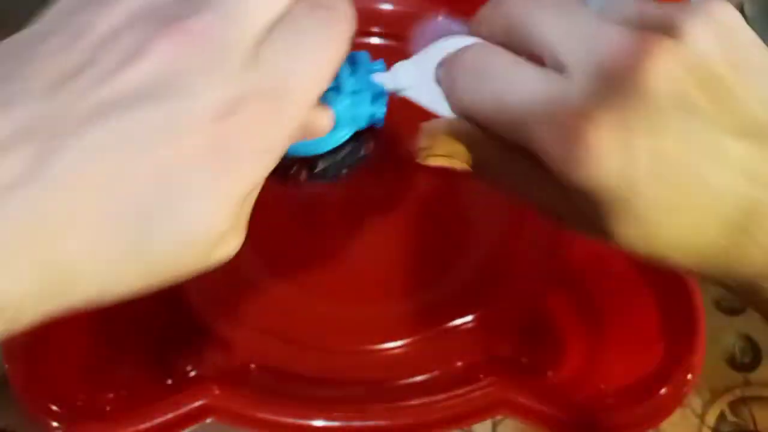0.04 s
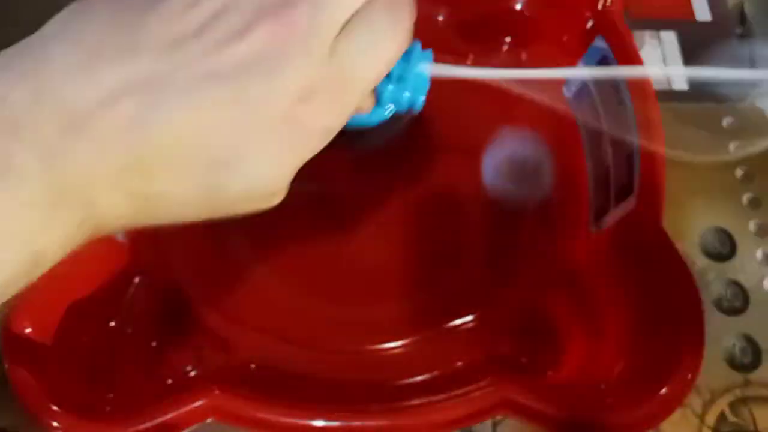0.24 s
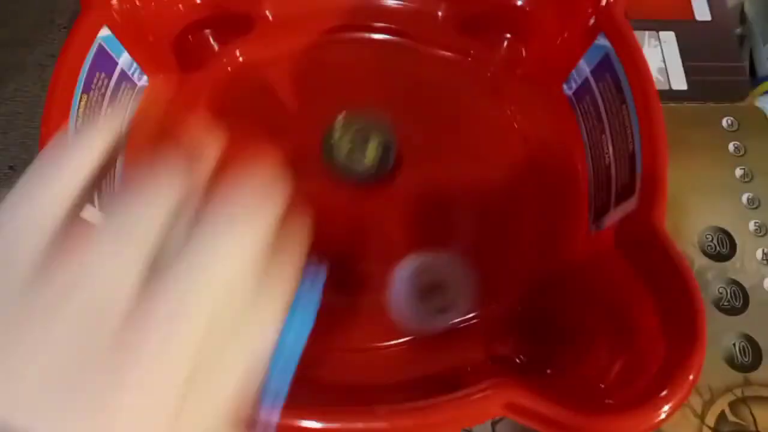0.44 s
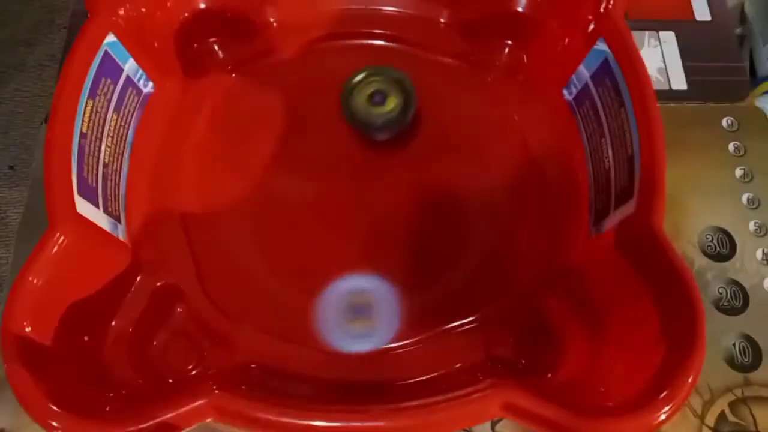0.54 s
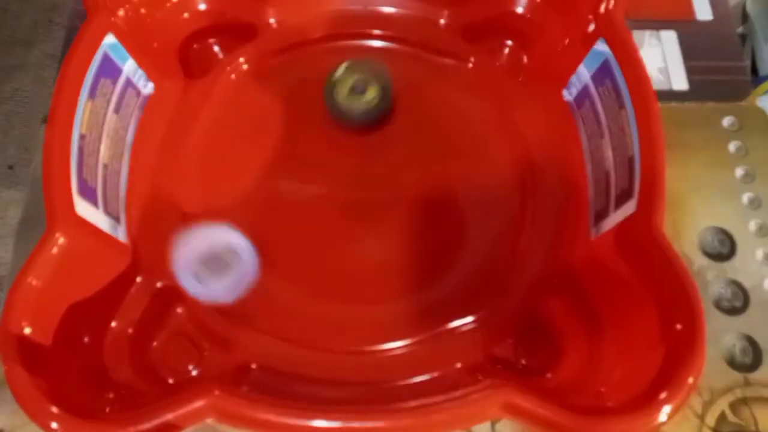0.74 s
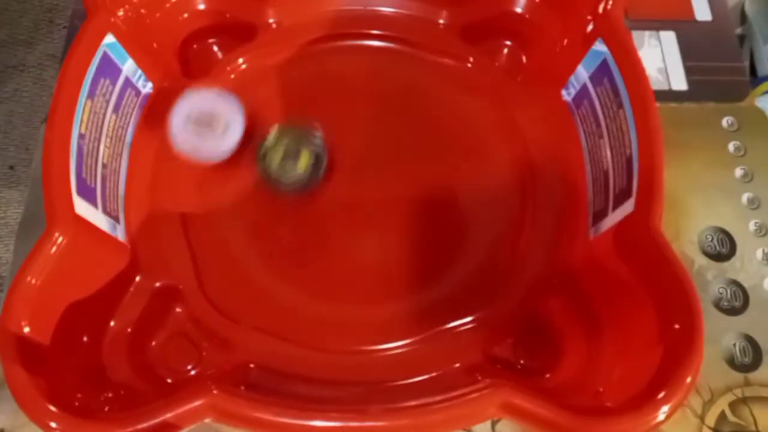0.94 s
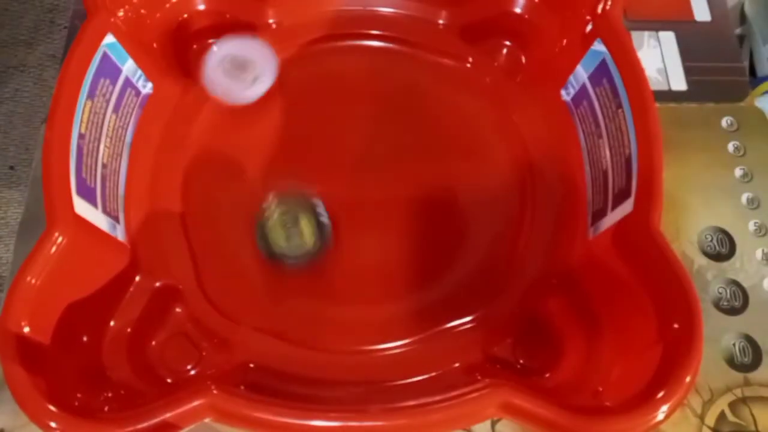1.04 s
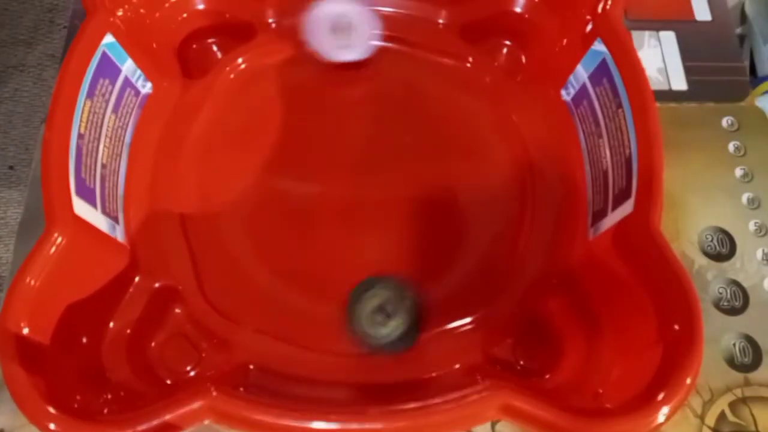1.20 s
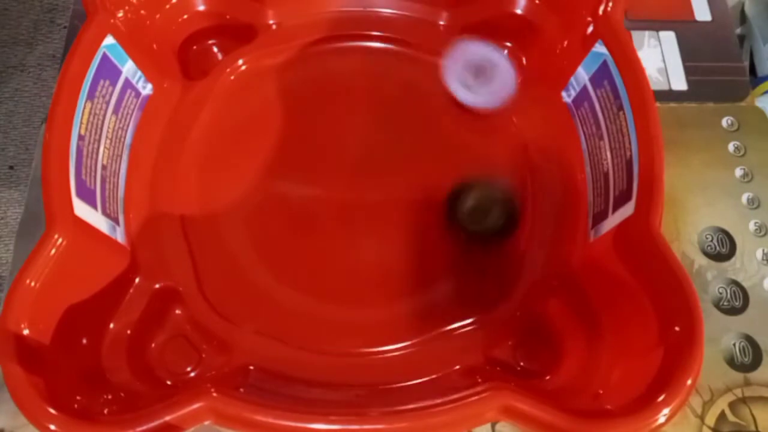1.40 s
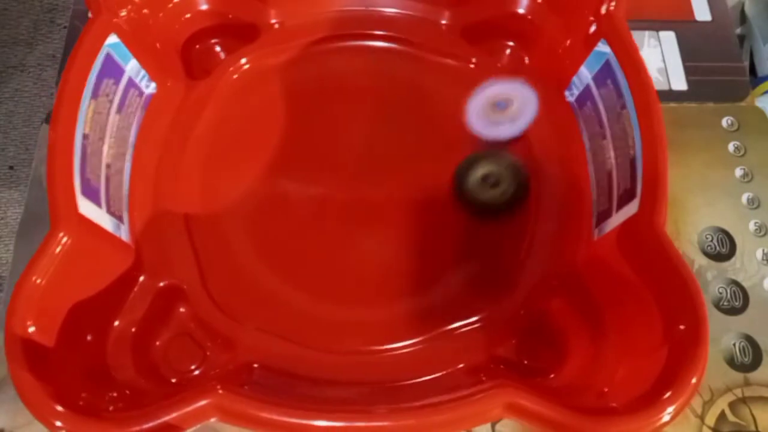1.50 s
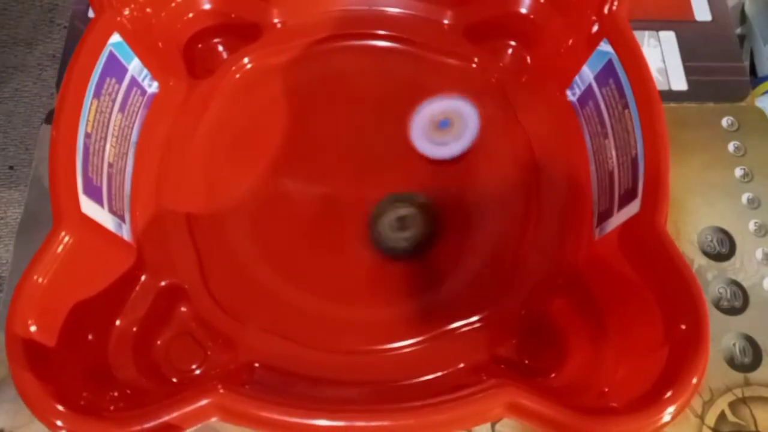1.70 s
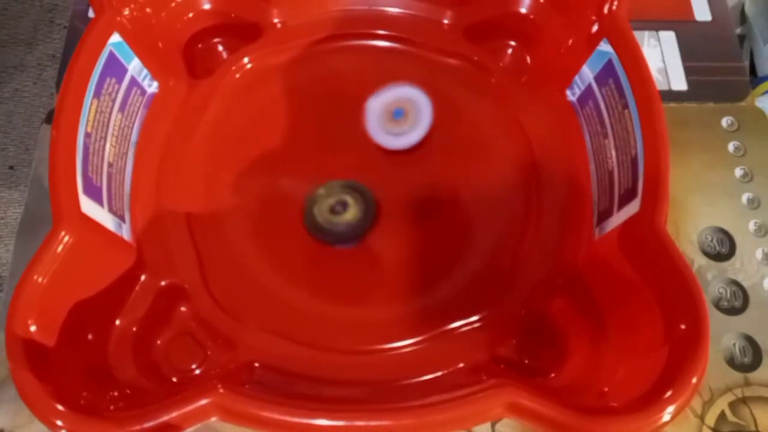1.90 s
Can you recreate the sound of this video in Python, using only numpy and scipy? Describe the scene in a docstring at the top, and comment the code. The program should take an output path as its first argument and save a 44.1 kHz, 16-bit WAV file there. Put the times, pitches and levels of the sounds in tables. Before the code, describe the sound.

Close up in a quiet room, a toothed ripcord rips loudly to launch a spinning top, which thuds into a plastic bowl, bounces and skitters, cracks twice against another metal top, and keeps whirring.

```python
"""Spinning tops in a plastic bowl

One top scuffs and whirs faintly: noise bursts, and random grains whose level wobbles at the spin rate.
A ripcord launches the other with snaps and clicks: tooth bursts through resonances.
It thuds, bounces and skitters: noise and modes.
The tops twice clash metal on metal, over a faint noise floor; a limiter ducks the loudest moments."""
import sys
import numpy as np
from scipy import signal
from scipy.io import wavfile
from scipy.ndimage import uniform_filter1d

SR = 44100
rng = np.random.default_rng(int(sys.argv[2]) if len(sys.argv) > 2 else 0)


def file_out(sig):
    """Save sig as 16-bit WAV at sys.argv[1]."""
    # one column per channel
    cols = np.atleast_2d(sig).T
    # limit, then scale
    lim = np.clip(cols, -1, 1)
    pcm = np.round(lim * 32767).astype(np.int16)
    wavfile.write(sys.argv[1], SR, pcm)


N = 85995
TIME = np.arange(N) / SR
AGE = TIME[:SR // 2]  # time since a strike, s

# Modes of the bowl. Each row: frequency in Hz, level in dB, t60 in seconds.
BOWL_MODES = [(143, 0, .33), (162, -4, .3), (180, 1, .33), (243, 0, .38), (275, -3, .38), (338, -5, .3),
              (364, -6, .3), (447, 1, .32), (512, -5, .22), (585, -2, .22), (630, -4, .22), (766, -5, .18),
              (900, -3, .18), (970, 1, .18)]
# Spectrum of metal clashes and of ticks on flaws. Each row: frequency in Hz, gain in dB.
CLASH_SPECTRUM = [(200, -51), (1000, -15), (2000, -9), (3000, -5.5), (4000, -5), (5500, 3), (7500, -5.5),
                  (10000, -14), (15000, -8.5)]


def amp(db):
    """Decibels to gain."""
    return 10 ** (np.asarray(db) / 20)


def unit(x, size=None):
    """Scales the first samples (or all) to rms 1."""
    return x / np.sqrt(np.mean(x[:size] ** 2) + 1e-20)


def fade(t60_s):
    """Exponential decay, 60 dB in t60."""
    return np.exp(-np.log(1000) * AGE / max(t60_s, 1e-4))


def add(mix, start_s, sound):
    """Mixes a sound in at a time, in place."""
    part = mix[max(round(start_s * SR), 0):][:len(sound)]
    part += sound[:len(part)]


def band(x, lo_hz, hi_hz, order=4):
    """Causal band-pass."""
    edges_hz = [lo_hz, min(hi_hz, SR / 2 - 100)]
    return signal.sosfilt(signal.butter(order, edges_hz, "band", fs=SR, output="sos"), x)


def colour(x, points):
    """Minimum-phase filter with the given spectrum."""
    hz, db = np.transpose(points)
    bins_hz = abs(np.fft.fftfreq(2048, 1 / SR)) + 1
    log_gain = np.log(amp(np.interp(np.log(bins_hz), np.log(hz), db)))
    # the Hilbert transform of log gain gives the phase
    taps = np.fft.ifft(np.exp(np.conj(signal.hilbert(log_gain)))).real
    return signal.fftconvolve(x, taps[:len(taps) // 2])[:len(x)]


def ring(modes):
    """Dying sines, each struck with its own phase."""
    out = 0
    for hz, db, t60_s in modes:
        out = out + amp(db) * fade(t60_s) * np.sin(2 * np.pi * (hz * AGE + rng.random()))
    return out


def fuzzy_ring(modes, width_hz):
    """Dying clusters of close partials: each mode's carrier is smeared by narrow complex noise."""
    pole = np.exp(-np.pi * width_hz / SR)
    smoother = np.poly([pole, pole])
    out = 0
    for hz, db, t60_s in modes:
        noise = rng.standard_normal((2, len(AGE) + 2000))  # 2000 samples of run-in
        real, imag = signal.lfilter([1], smoother, noise)[:, -len(AGE):]
        cluster = ((real + 1j * imag) * np.exp(2j * np.pi * hz * AGE)).real
        out = out + amp(db) * fade(t60_s) * unit(cluster, size=2200)
    return out


def ticks(rate_hz, spread_db, t60_s):
    """One short noise burst per cycle, each of its own strength."""
    strength = amp(spread_db * np.clip(rng.standard_normal(N), -2, 2))
    beats = np.diff(np.floor(np.cumsum(rate_hz) / SR), prepend=0) * strength
    return signal.fftconvolve(beats, fade(t60_s))[:N] * rng.standard_normal(N)


def room(x):
    """Diffuse tail of the room: noise bands that decay at their own rates."""
    # Each row: low edge in Hz, high edge in Hz, t60 in seconds.
    room_bands = [(100, 1520, 1), (2080, 6200, 0.23), (7600, 28600, 0.13)]
    rise_s = 0.0031
    noise = rng.standard_normal(len(AGE))
    tail = sum(band(noise, lo_hz, hi_hz) * fade(t60_s) for lo_hz, hi_hz, t60_s in room_bands)
    tail = tail * np.minimum(AGE / rise_s, 1)
    return signal.fftconvolve(x, tail / np.linalg.norm(tail))[:N]


def floor():
    """The quiet room: steady faint coloured noise under everything."""
    # Each row: frequency in Hz, gain in dB.
    floor_spectrum = [(30, -20), (60, -21), (170, -3), (450, 0.5), (1000, -2), (1450, -10), (2000, -29),
                      (2750, -15.5), (3800, -22.5), (7000, -20.5), (8700, -27), (9800, -50), (15500, -38)]
    floor_db = -50
    return amp(floor_db) * unit(colour(rng.standard_normal(N), floor_spectrum))


def rumble():
    """Low band of noise that comes and goes as the tops travel."""
    # Each row: time in seconds, level in dB.
    rumble_level = [(0, -72), (.4, -79), (.55, -52), (1.1, -55.5), (1.45, -71), (1.75, -71), (1.85, -48.5),
                    (1.95, -54)]
    level_db = np.interp(TIME, *np.transpose(rumble_level))
    return unit(band(rng.standard_normal(N), 67, 142, order=2)) * amp(level_db)


def scuffs():
    """The lone top scuffs the bowl unevenly before the launch: short bursts of bright noise."""
    # Each row: start in seconds, level in dB.
    scuff_hits = [(.011, -55), (.0405, -52.5), (.057, -50), (.1005, -56), (.1155, -51.5), (.131, -56),
                  (.146, -52)]
    t60_s = 0.024
    out = np.zeros(N)
    for start_s, db in scuff_hits:
        burst = band(rng.standard_normal(len(AGE)) * fade(t60_s), 4400, 7750)
        add(out, start_s, amp(db) * unit(burst, size=180))
    return out


def rolling():
    """Spinning tips grind over the bowl as random grains that excite its modes, and tick on small flaws."""
    # Each row: time in seconds, level in dB.
    roll_level = [(.165, -69), (.178, -45), (.21, -34.5), (.29, -41), (.345, -65), (.44, -71), (.6, -47),
                  (.79, -50), (1.0, -46.5), (1.2, -39.5), (1.45, -44.5), (1.6, -39), (1.8, -37.5),
                  (1.95, -43)]
    # Each row: frequency in Hz, gain in dB.
    roll_spectrum = [(30, -37), (80, -23), (160, -6), (450, -1), (1000, 2.5), (1700, 0), (3500, -6.5),
                     (6500, -7), (8500, -53), (10000, -54), (15500, -47)]
    spin_hz, spin_drift, wobble_depth = 64.7, 0.055, 0.41
    grains_per_s, grain_spread_db, bowl_ring_db = 1500, 1, -2.5
    ticks_per_s, tick_db, tick_spread_db, tick_t60_s = 18, -16.5, 3, 0.004

    drift = unit(uniform_filter1d(rng.standard_normal(N), size=2000))
    speed = 1 + spin_drift * drift
    wobble = 1 + wobble_depth * np.sin(2 * np.pi * np.cumsum(spin_hz * speed) / SR)

    hits = (rng.random(N) < grains_per_s / SR) * rng.choice([-1, 1], N)
    strength = amp(grain_spread_db * np.minimum(rng.exponential(1, N), 4))
    grains = colour(hits * strength * wobble, roll_spectrum)
    rung = signal.fftconvolve(grains, ring(BOWL_MODES))[:N]
    grind = unit(grains) + amp(bowl_ring_db) * unit(rung)

    flaws = unit(colour(ticks(ticks_per_s * speed, tick_spread_db, tick_t60_s), CLASH_SPECTRUM))
    level_db = np.interp(TIME, *np.transpose(roll_level))
    return (unit(grind) + amp(tick_db) * flaws) * amp(level_db)


def clashes():
    """Metal rims collide: a bright noise crack with a weaker, slower tail, and a thin smeared ring."""
    # Each row: start in seconds, level in dB.
    clash_hits = [(1.547, -15.5), (1.5505, -7), (1.6709, -5), (1.674, -10.5)]
    # Modes of the metal discs. Each row: frequency in Hz, level in dB, t60 in seconds.
    disc_modes = [(2750, -8, .13), (3774, -9, .13), (4400, -3, .25), (5205, -4, .22), (5525, 0, .28),
                  (5810, -2, .25), (6950, -4, .22), (8440, -13, .15)]
    crack_t60_s, tail_t60_s, tail_db = 0.021, 0.2, -20
    disc_width_hz, disc_db = 120, -30
    shape = np.hypot(fade(crack_t60_s), amp(tail_db) * fade(tail_t60_s))
    out = np.zeros(N)
    for start_s, db in clash_hits:
        crack = unit(colour(rng.standard_normal(len(AGE)) * shape, CLASH_SPECTRUM), size=180)
        discs = unit(fuzzy_ring(disc_modes, disc_width_hz), size=530)
        add(out, start_s, amp(db) * (crack + amp(disc_db) * discs))
    return out


def note(hz, db):
    """Resonance of the struck spot: swells within one cycle, rings longer the lower it is, dies unevenly."""
    t60_at_1khz_s, damping = 0.075, 0.54  # damping: how fast t60 shortens with pitch
    tail_db, tail_t60_s, tail_rise_s, tail_width_hz = -22, 0.2, 0.015, 200
    t60_s = t60_at_1khz_s * (1000 / hz) ** damping
    tone = np.minimum(AGE * hz, 1) * fade(t60_s) * np.sin(2 * np.pi * hz * AGE)
    tail = fuzzy_ring([(hz, tail_db, tail_t60_s)], tail_width_hz) * np.minimum(AGE / tail_rise_s, 1)
    return amp(db) * (tone + tail)


def knock(levels_db):
    """A snap, a quick noise flutter with a slower tail, and the ring of the bowl, band by band."""
    # Each row: low edge in Hz, high edge in Hz, fast t60 in seconds, slow t60 in seconds,
    # level of the slow part in dB, strength of the first snap as a linear impulse.
    knock_bands = [(116.5, 425, 0.12, 0.3, -10, 18), (457, 1458, 0.058, 0.21, -15, 2.5),
                   (1586, 3360, 0.037, 0.35, -16.5, 3.4), (3630, 7530, 0.041, 0.22, -13.5, 1),
                   (7400, 15700, 0.031, 0.18, -8.5, 1.2)]
    bowl_ring_db = -4
    bowl = amp(bowl_ring_db) * unit(ring(BOWL_MODES), size=530)
    out = 0
    for (lo_hz, hi_hz, fast_s, slow_s, slow_db, snap), db in zip(knock_bands, levels_db):
        shape = np.hypot(fade(fast_s), amp(slow_db) * fade(slow_s))
        flutter = rng.standard_normal(len(AGE)) * shape
        flutter[0] += snap
        shell = unit(band(flutter, lo_hz, hi_hz), size=530)
        out = out + amp(db) * unit(shell + band(bowl, lo_hz, hi_hz), size=530)
    return out


def knocks():
    """Launcher snaps and clicks, then landings, bounces and bumps on plastic; some also ring with notes."""
    # Each row: start in seconds, thump, shell, clack and tick levels in dB,
    # notes of the struck spot as pairs of frequency in Hz and level in dB.
    knock_hits = [(.197, -51, -31, -40, -37, [(748, -22), (1227, -21.5), (2870, -26)]),
                  (.207, -62, -31, -31, -22.5, [(645, -26), (2800, -24), (5940, -27)]),
                  (0.237, -65, -40, -36, -32, []), (.254, -49, -37.5, -26, -26, [(520, -37)]),
                  (0.3203, -41, -29, -33, -23, []), (.469, -16.5, -21, -23.5, -21.5, [(178, -17.5),
                  (255, -10), (339, -15.5), (915, -13.5)]), (0.5658, -23, -25.5, -30, -36, [(349, -17),
                  (662, -23.5), (1302, -21)]), (0.6057, -28.5, -29, -48, -53, [(247, -22.5), (1260, -32)]),
                  (.641, -45, -31, -33, -37.5, []), (.648, -35, -33.5, -42, -38, []),
                  (.673, -23, -22, -27, -26.5, [(450, -16), (590, -21), (952, -21), (1090, -22.5)]),
                  (.684, -25, -25.5, -40, -35, []), (.716, -31.5, -33, -42, -53, []),
                  (0.8202, -30, -24.5, -32.5, -30.5, [(450, -19.5), (1070, -21.5), (1405, -19)]),
                  (.838, -33.5, -31.5, -37, -42, []), (.853, -38, -28.5, -34.5, -32.5, [(450, -25),
                  (705, -20), (1100, -33)]), (.863, -52, -40, -41, -35, [(582, -23)]),
                  (.874, -35, -38, -36.5, -41, []), (.9252, -30.5, -31, -33.5, -30.5, [(940, -19),
                  (1010, -16), (1100, -26), (6200, -20.5)]), (.934, -34, -36, -35, -34, []),
                  (1.0028, -39, -26, -34.5, -29.5, [(339, -36), (931, -28), (1240, -21.5), (2557, -29.5)]),
                  (1.012, -30, -28.5, -43, -48, []), (1.045, -39.5, -32.5, -40, -37.5, []),
                  (1.087, -32, -34.5, -36.5, -40, []), (1.1251, -40, -38.5, -36.5, -41.5, []),
                  (1.171, -41, -33, -39, -41, []), (1.184, -55, -30.5, -48, -47, []),
                  (1.194, -54, -28, -35.5, -37.5, []), (1.219, -38, -37, -37.5, -43, [(1330, -26)]),
                  (1.246, -46, -39, -48, -57, [(540, -22.5)]), (1.2812, -36.5, -18.5, -22, -23, [(586, -12),
                  (990, -16.5), (2734, -21)]), (1.295, -33, -35, -45, -36, [(500, -24)]),
                  (1.3253, -37, -27, -35, -38.5, []), (1.3779, -42, -30, -35.5, -40.5, [(511, -30),
                  (1168, -32.5)]), (1.428, -54, -34, -39, -38.5, [(2170, -29.5), (6250, -30)]),
                  (1.4717, -59, -33.5, -41.5, -45, []), (1.516, -67, -33, -36.5, -38.5, []),
                  (1.551, -43, -21.5, -29.5, -22, [(764, -18.5), (952, -20), (2793, -16.5)]),
                  (1.608, -69, -30, -45, -43, []), (1.618, -38.5, -31.5, -30.5, -32.5, [(1308, -22),
                  (3719, -23)]), (1.6245, -39.5, -34, -37, -32, []), (1.73, -57, -33, -34, -40.5, []),
                  (1.757, -55, -35.5, -45, -50, []), (1.78, -66, -34, -37, -41.5, []),
                  (1.829, -45, -33.5, -36, -39, []), (1.867, -48, -32, -34, -42.5, []),
                  (1.873, -64, -33, -34, -44, []), (1.89, -37.5, -34.5, -49, -50, []),
                  (1.92, -39, -36.5, -39, -48, []), (1.925, -39, -31.5, -34, -35, [(1260, -26)])]
    treble_db = -14  # top band, relative to the tick
    out = np.zeros(N)
    for start_s, thump_db, shell_db, clack_db, tick_db, notes in knock_hits:
        body = knock([thump_db, shell_db, clack_db, tick_db, tick_db + treble_db])
        add(out, start_s, body + sum(note(hz, db) for hz, db in notes))
    return out


def launcher():
    """Gear teeth rattle faster as the cord is pulled, shriek as the top lets go, then run out."""
    # Each row: time in seconds, level in dB, teeth per second.
    pull = [(.205, -44, 153), (.235, -35.5, 280), (.25, -29.5, 412), (.268, -28, 570), (.291, -20, 687),
            (0.301, -25.5, 890), (0.314, -33.5, 800), (.321, -9.5, 900), (.334, 7, 850), (.349, -5.5, 750),
            (.37, -8, 700), (.412, -17, 640), (.453, -40.5, 210)]
    # Each row: frequency in Hz, gain in dB.
    gear_spectrum = [(200, -44), (700, -24), (1800, -15), (2800, -1.5), (3700, -8.5), (5400, 3), (6400, -3),
                     (7400, 2), (9500, -12.5), (15500, -14)]
    # Resonances of the launcher. Each row: frequency in Hz, width in Hz, level in dB.
    gear_modes = [(2720, 45, -8), (2880, 60, -9), (4397, 30, -11), (4970, 35, -11), (5352, 45, -4),
                  (7035, 55, -7), (7305, 50, 2), (7660, 25, -7)]
    tooth_t60_s, tooth_spread_db = 0.007, 1.8
    ring_db, room_db = -6, -22.5

    time_s, db, teeth_per_s = np.transpose(pull)
    rate_hz = np.interp(TIME, time_s, teeth_per_s)
    # dividing by sqrt(rate) keeps power steady as the teeth crowd
    teeth = ticks(rate_hz, tooth_spread_db, tooth_t60_s) / np.sqrt(rate_hz)
    level_db = np.interp(TIME, time_s, db, left=-120, right=-120)
    drive = unit(colour(teeth, gear_spectrum)) * amp(level_db)

    modes = []
    for hz, width_hz, mode_db in gear_modes:
        t60_s = np.log(1000) / np.pi / width_hz
        modes.append((hz, mode_db + 10 * np.log10(width_hz), t60_s))
    rung = signal.fftconvolve(drive, ring(modes))[:N]
    out = drive + amp(ring_db) * unit(rung) * drive.std()
    return out + amp(room_db) * room(out)


def scene():
    """All sources, nearly mono; clashes and launcher spread a little in the treble."""
    width_db = -34
    bright = clashes() + launcher()
    mid = bright + knocks() + rolling() + scuffs() + rumble() + floor()
    delayed = np.pad(bright, (40, 0))[:N]
    side = amp(width_db) * band(delayed, 4500, 19000, order=16)
    return np.array([mid + side, mid - side])


def record(dry):
    """Fast limiter with linear dB recovery, hard clip, then low-pass."""
    limit_db, recover_db_per_s, clip_level, edge_hz = -12, 147, 0.78, 15950
    power = abs(uniform_filter1d((dry ** 2).mean(0), size=130))
    power_db = 10 * np.log10(power + 1e-12)
    fall_db = TIME * recover_db_per_s
    held_db = np.maximum.accumulate(power_db + fall_db) - fall_db
    over_db = np.maximum(held_db - limit_db, 0)
    limited = np.clip(dry / amp(uniform_filter1d(over_db, size=90)), -clip_level, clip_level)
    taps = signal.firwin(401, edge_hz, window=("kaiser", 9), fs=SR)
    return signal.oaconvolve(limited, taps[None], "same")


dry = scene()
out = record(dry)
file_out(out)
```